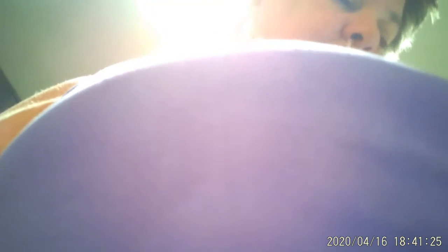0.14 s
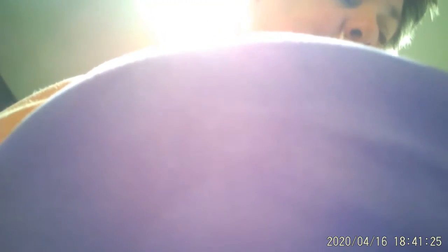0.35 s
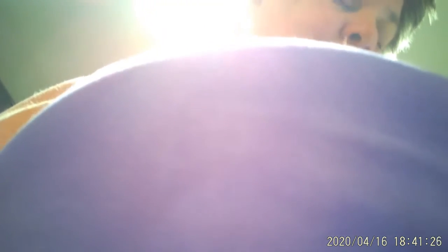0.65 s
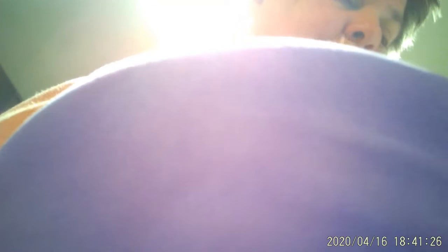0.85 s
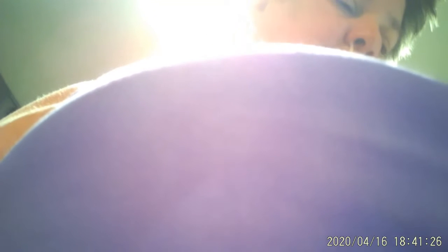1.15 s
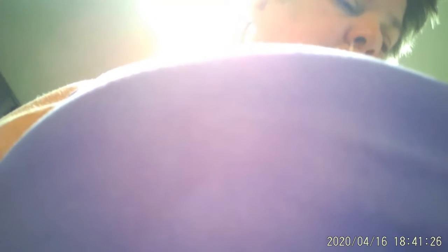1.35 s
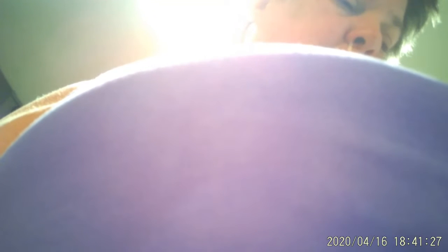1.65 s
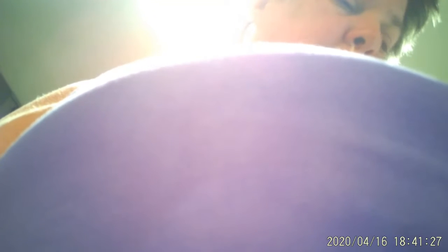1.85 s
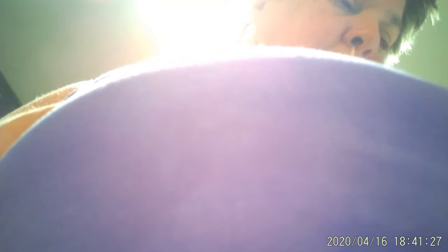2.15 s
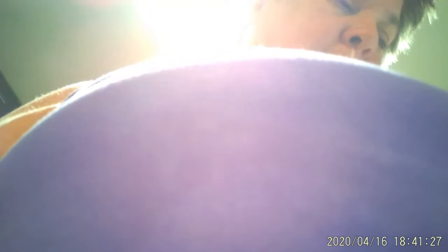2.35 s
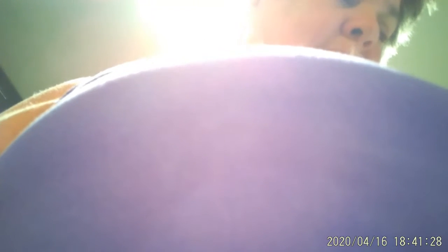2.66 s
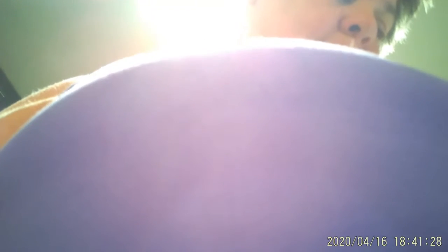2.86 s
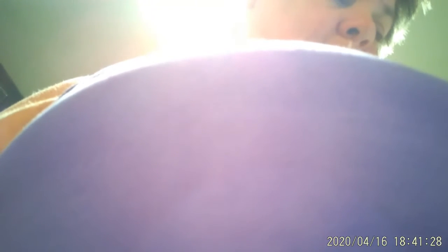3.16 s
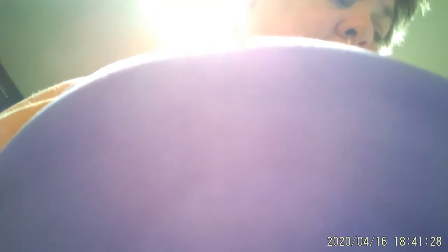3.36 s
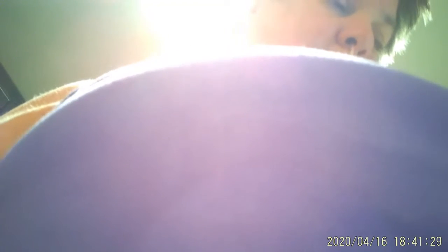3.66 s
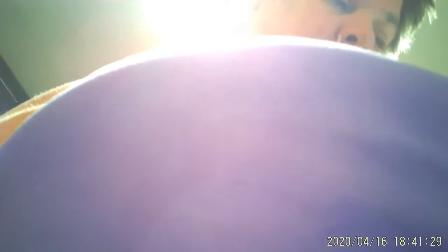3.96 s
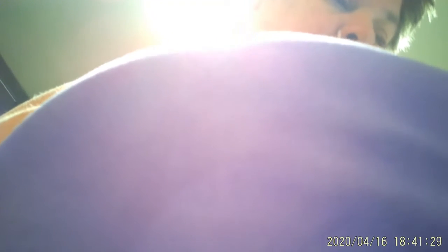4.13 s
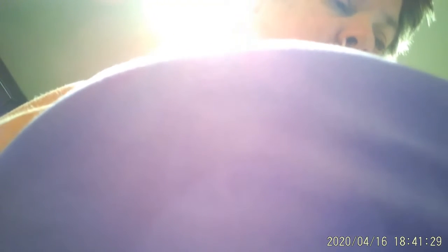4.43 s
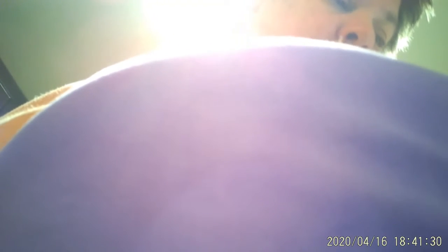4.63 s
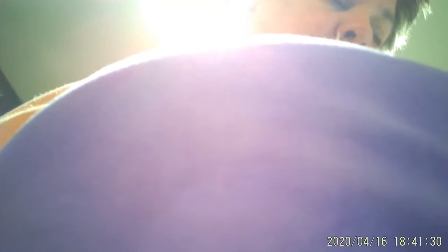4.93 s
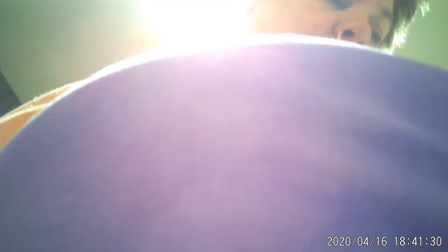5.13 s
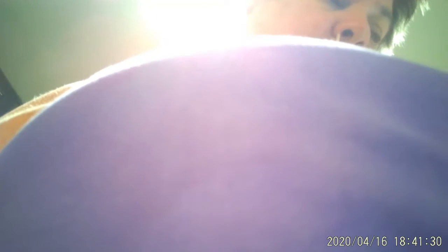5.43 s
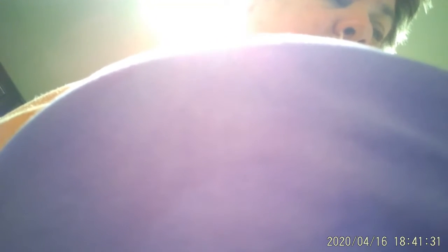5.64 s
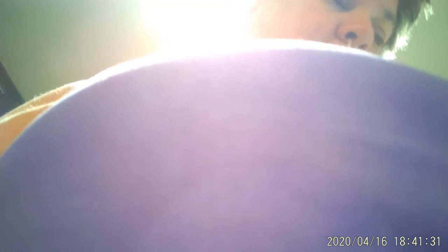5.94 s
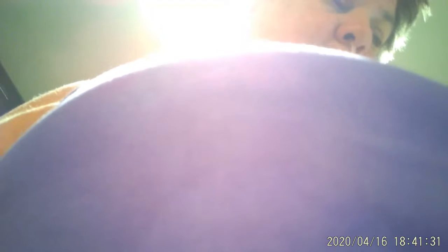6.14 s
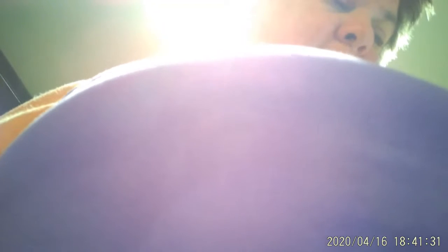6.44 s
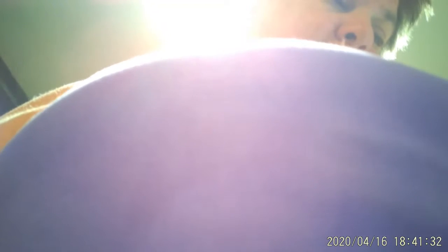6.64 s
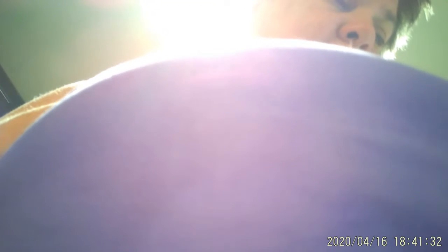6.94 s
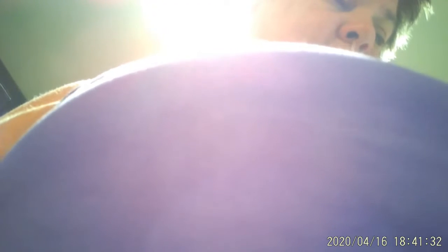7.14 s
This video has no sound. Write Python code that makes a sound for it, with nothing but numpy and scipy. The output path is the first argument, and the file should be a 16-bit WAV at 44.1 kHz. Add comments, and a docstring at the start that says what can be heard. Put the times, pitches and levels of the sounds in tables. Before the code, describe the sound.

Steel knives, forks and spoons are dropped and pushed in a drawer tray. Quick clinks build to a hard, loud clatter just after two seconds, pause briefly, then resume with another strong clank near four seconds. Lighter taps and a gap follow before a last small burst. Each blow is short and damped, with little skids and tray knocks. Close, cheap microphone in a small kitchen with low murmur, hum and hiss.

```python
"""Cutlery in a drawer tray

Knives, forks and spoons are dropped, pushed and stirred in a drawer tray in a small kitchen.
Each blow rings damped steel and tray modes, with a noise crack and a skid of small jolts.
Between blows the pile rattles (random taps on the same modes) and scrapes (coloured noise).
A cheap microphone nearby adds hiss and mains hum to the murmur of the room; sparse echoes are the kitchen."""
import sys
import numpy as np
from scipy import signal
from scipy.fft import rfft, irfft, next_fast_len
from scipy.io import wavfile
from scipy.ndimage import uniform_filter1d

SR = 44100
rng = np.random.default_rng(int(sys.argv[2]) if len(sys.argv) > 2 else 0)


def waveform_to_disk(signal):
    """Save audio, clipped to [-1, 1], as 16-bit WAV at the path in sys.argv[1]."""
    frames = np.transpose(np.atleast_2d(signal))
    scaled = np.clip(frames, -1, 1) * 32767
    samples = np.round(scaled).astype(np.int16)
    wavfile.write(sys.argv[1], SR, samples)


N = 321512
TREBLE_HZ = 6300  # steel modes above this form the treble layer


def gain_of(db):
    """Amplitude factor of a level in dB."""
    return 10 ** (np.asarray(db) / 20)


def evened(x):
    """Scales a sound to rms 1."""
    return x / np.sqrt(np.mean(x ** 2) + 1e-20)


def read(points, hz):
    """Interpolates (Hz, value) points over log frequency."""
    point_hz, value = np.transpose(points)
    return np.interp(np.log(hz + 1), np.log(point_hz + 1), value)


def coloured(x, points):
    """Weights a sound by a spectrum."""
    size = next_fast_len(len(x))
    weight = gain_of(read(points, np.fft.rfftfreq(size, 1 / SR)))
    return irfft(rfft(x, size) * weight, size)[:len(x)]


def lowpass(x, hz):
    """Steep linear-phase lowpass without delay."""
    return signal.oaconvolve(x, signal.firwin(511, hz, window=("kaiser", 9), fs=SR), "same")


# Spectrum of murmur and hiss. Each row: frequency in Hz, relative density in dB per Hz.
ROOM_SPECTRUM = [(8, -32), (27, 5), (42, -20), (90, -19), (125, -3.5), (200, -5.5), (400, -13), (630, -16),
                 (1000, -10.5), (1300, -26), (1700, -27), (2500, -28), (3600, -32.5), (5000, -41),
                 (8000, -44)]
# Steady tones: mains hum and a faint whine. Each row: frequency in Hz, level in dB rms.
HUM_TONES = [(29.5, -61), (59.2, -55.5), (118.4, -63.5), (14169, -106)]
ROOM_DB_RMS = -44.46


def room_tone():
    """Steady murmur and hiss as coloured noise, under sines for mains hum and a faint whine."""
    t = np.arange(N) / SR
    hum = np.zeros(N)
    for hz, db in HUM_TONES:
        hum += gain_of(db) * np.sqrt(2) * np.sin(2 * np.pi * (hz * t + rng.random()))
    murmur = evened(coloured(rng.standard_normal(N), ROOM_SPECTRUM))
    return gain_of(ROOM_DB_RMS) * murmur + hum


# Reverberation of the kitchen. Each row: frequency in Hz, t60 in s.
WALL_T60 = [(300, 0.43), (1000, 0.37), (4000, 0.14), (12000, 0.12)]


def kitchen(x):
    """Sparse echoes of random sign, each band dying at its own speed."""
    taps = np.zeros(SR // 2)
    at = np.arange(200, len(taps) - 20, 20)
    taps[at + rng.integers(0, 20, len(at))] = rng.choice([-1., 1.], len(at))
    hz, t, bands = signal.stft(taps, SR, nperseg=256)
    dying = gain_of(-60 * t / read(WALL_T60, hz)[:, None])
    tail = signal.istft(bands * dying, SR, nperseg=256)[1]
    return signal.fftconvolve(x, tail / np.linalg.norm(tail))[:N]


# Shoves of the pile. Each row: start of full force in s, steel rattle in relative dB, swell in s,
# hold in s, fade in s, treble in dB over steel.
PILE_SHOVES = [(0.208, -31, .04, 0.036, 0.097, -8), (0.347, -28.5, 0.052, 0.0088, 0.07, -11),
               (0.453, -49, .02, 0.01, 0.15, -14), (0.755, -41.5, 0.033, .02, 0.036, -14),
               (0.836, -47, 0.092, .05, .1, -13), (0.987, -25, 0.052, 0.086, 0.13, -15.5),
               (1.203, -43, 0.045, 0.046, 0.052, -15), (1.312, -40.5, 0.013, 0.015, 0.045, -20),
               (1.435, -51.5, 0.14, .05, 0.055, -18), (1.618, -28, 0.06, 0.036, 0.28, -7.5),
               (1.86, -31, 0.087, 0.077, 0.11, -13), (1.938, -25.5, 0.029, 0.027, 0.25, -20),
               (2.094, -26, 0.045, 0.14, 0.092, -4.5), (2.232, -16.5, 0.081, 0.013, 0.085, -6),
               (2.358, -21.5, 0.028, 0.0084, 0.11, -11), (2.408, -33.5, 0.058, 0.019, 0.083, -15),
               (3.042, -37, 0.011, 0.0065, 0.044, -21), (3.117, -36, 0.0047, 0.0071, 0.12, -13),
               (3.285, -45, 0.036, .015, 0.02, -8), (3.379, -32.5, .05, .06, 0.079, -9.5),
               (3.613, -50, 0.024, 0.015, 0.082, -3), (3.762, -33, 0.021, .04, 0.16, -13.5),
               (3.839, -27, 0.082, 0.016, 0.12, -19), (3.994, -31.5, 0.02, 0.016, 0.052, -12.5),
               (4.214, -46, 0.067, 0.024, 0.035, -12), (4.308, -26.5, 0.063, 0.027, 0.041, -6.5),
               (4.379, -24.5, .012, 0.0045, 0.037, -10), (4.443, -42.5, 0.15, 0.046, .08, -18),
               (5.015, -34, .03, .015, .04, -8), (5.047, -29.5, .015, 0.029, .04, -13),
               (5.11, -42.5, 0.046, 0.024, .08, -21), (5.15, -30.5, 0.013, 0.0019, 0.011, -13),
               (5.235, -52, .03, 0.063, .04, -14), (5.474, -28, 0.031, 0.017, 0.069, -16),
               (6.662, -35, 0.007, 0.051, 0.058, -6), (6.825, -36.5, 0.028, 0.025, .03, -7.5),
               (6.863, -31, .01, 0.018, 0.12, -5.5), (7.034, -38.5, 0.0086, .003, 0.035, -16),
               (7.132, -48.5, 0.23, 0.03, 0.047, -12)]
SWELL_DB = 21.5  # gained over the swell, lost over the fade
FADE_BEND = 1.295  # a fade lingers, then drops away
TRAY_DB = -0.26  # over steel at full force
TRAY_SLOPE, TREBLE_SLOPE = 0.27, 0.28  # a weaker shove: the tray fades less than steel, the treble more
KNEE_DB = 33  # further below the peak all three layers fall dB for dB


def shoving(t):
    """Levels of steel, tray and treble: every shove swells, holds and fades; powers add."""
    power = np.full((3, len(t)), 1e-14)
    share = np.array([[1], [1 - TRAY_SLOPE], [1 + TREBLE_SLOPE]])
    for s, steel_db, swell_s, hold_s, fade_s, treble_db in PILE_SHOVES:
        late = t - s
        swell_db = SWELL_DB * late / swell_s
        fade_db = -SWELL_DB * (np.maximum(late - hold_s, 0) / fade_s) ** FADE_BEND
        down_db = np.maximum(np.where(late < 0, swell_db, fade_db), -150)
        knee_db = np.minimum(down_db + KNEE_DB, 0)
        peak_db = steel_db + np.array([[0], [TRAY_DB], [treble_db]])
        power += gain_of(peak_db + share * (down_db - knee_db) + knee_db) ** 2
    return np.sqrt(power)


def jostled(modes, extra_hz, per_s, spread_db):
    """Tiny collisions of uneven size, each ringing one mode as a two-pole resonator."""
    out = np.zeros(N)
    for hz, width_hz, db in modes:
        taps = (rng.random(N) < per_s / SR) * rng.choice([-1., 1.], N)
        size = np.minimum(rng.exponential(1, N), 3)
        taps *= gain_of(spread_db * size)
        r = np.exp(-np.pi * (width_hz + extra_hz) / SR)
        poles = [1, -2 * r * np.cos(2 * np.pi * hz / SR), r * r]
        out += gain_of(db) * evened(signal.lfilter([1], poles, taps))
    return evened(out)


# Cutlery modes, shared with the blows. Each row: frequency in Hz, base width in Hz, base gain in dB.
STEEL_MODES = [(1698, 170, 2.5), (1823, 76, -8.5), (2266, 104, -1), (2540, 51, -8), (2781, 120, -2),
               (3379, 116, 0.5), (3630, 56, -15), (4294, 31, -8), (4675, 75, 0), (4750, 72, -6.5),
               (5000, 77, -1.5), (5560, 66, -4.5), (6038, 76, -9.5), (6270, 51, -13), (7200, 14, -14),
               (7515, 125, -12), (7730, 11, -19.5), (8010, 50, -15.5), (8640, 16, -18), (9620, 41, -8),
               (10270, 44, -8), (11480, 80, -16), (12000, 49, -39), (13300, 60, -31), (14890, 140, -3.5),
               (13400, 30, -10)]
# Tray and drawer modes, shared with the blows. Each row: frequency in Hz, base width in Hz, base gain in dB.
TRAY_MODES = [(218, 91, -9.5), (362, 25, -8.5), (402, 49, -2), (509, 26, -8), (610, 40, -8),
              (738, 15, -7.5), (878.5, 53, -0.5), (981, 66, -5), (1148, 45, -5)]
# Colour of bare contacts, shared with the blows. Each row: frequency in Hz, relative density in dB per Hz.
CONTACT_SPECTRUM = [(120, -69), (200, -8.5), (390, -14.5), (581, -10), (624, 2.5), (683, -15), (880, -7.5),
                    (1460, -7.5), (1720, 1), (3870, -1.5), (4890, -12), (6770, -21), (10100, -28.5),
                    (15000, -27)]
LUMPS_DB, LUMP_S = 2, 0.012  # the rattle comes in uneven lumps


def rattle():
    """The stirred pile: ringing steel, dry scraping and the shaken tray follow the hand."""
    level = shoving(np.arange(0, N + 32, 32) / SR).repeat(32, axis=1)[:, :N]
    knots = rng.standard_normal(N // 200)
    lumps = np.interp(np.arange(N) / SR / LUMP_S, np.arange(len(knots)), knots)
    level = level * gain_of(LUMPS_DB * lumps)

    grain_size = np.minimum(rng.exponential(1, N // 40 + 1), 3).repeat(40)[:N]
    grit = coloured(rng.standard_normal(N) * gain_of(0.82 * grain_size), CONTACT_SPECTRUM)
    low, below_treble = lowpass(grit, 1304), lowpass(grit, TREBLE_HZ)

    steel_modes = [m for m in STEEL_MODES if m[0] <= TREBLE_HZ]
    treble_modes = [m for m in STEEL_MODES if m[0] > TREBLE_HZ]
    steel = jostled(steel_modes, extra_hz=45, per_s=440, spread_db=5)
    treble = jostled(treble_modes, extra_hz=14, per_s=290, spread_db=6)
    tray = jostled(TRAY_MODES, extra_hz=30.6, per_s=120, spread_db=3)

    layers = [0.61 * steel + 0.51 * evened(below_treble - low),
              0.75 * tray + 0.45 * evened(low),
              0.67 * treble + 0.68 * evened(grit - below_treble)]
    return gain_of(-3) * (uniform_filter1d(level, 150) * layers).sum(0)


def skidding(skid, jolts):
    """The first contact, then a spray of small jolts while the piece slides to rest."""
    t = np.arange(len(jolts)) / SR
    train = 0.49 * skid * jolts * np.exp(-(t / (0.03 * skid)) ** 2)
    train[0] = 1
    return train


def favoured(modes_hz, db, struck_hz, luck, near_db, spread, luck_db):
    """Gains of the modes: those near the struck pitch are strong, and chance wakes a few others."""
    near = np.exp(-(np.log(modes_hz / struck_hz) / spread) ** 2)
    return gain_of(db + near_db * near + luck_db * luck[:len(db)] ** 3)


def ring(modes_hz, widths_hz, gains, phases, rise_s, t):
    """Dying sines with a short rise, scaled to peak 1; phases in cycles."""
    decay = np.exp(-np.pi * np.outer(widths_hz, t))
    sines = np.sin(2 * np.pi * (np.outer(modes_hz, t) + phases[:, None]))
    sound = gains @ (decay * sines) * (1 - np.exp(-t / rise_s))
    return sound / abs(sound).max()


# Blows. Each row: start in s, level in dB, tray knock in dB over level, treble in dB over level,
# clank pitch in Hz, favoured knock pitch in Hz, skid after the blow from 0 to 1.
CUTLERY_BLOWS = [(0.1447, -20.5, -5, -13, 2380, 338, 0.7), (0.191, -20.5, -13, -11.5, 3100, 589, 0.7),
                 (0.2014, -20, -22, -13, 4850, 323, 1), (0.2348, -17, -0.5, -19, 1930, 766, 0.54),
                 (0.3438, -17, -7.5, -9, 4400, 510, .8), (0.4567, -29.5, -10, -16, 3730, 1040, 0.76),
                 (0.5339, -32.5, -10, -15, 1760, 1010, 0.93), (0.598, -31, -0.5, -31, 2370, 905, 0.56),
                 (0.7539, -28, -1, -12.5, 1600, 870, 0.9), (0.8322, -19, -5.5, -18.5, 4580, 835, .65),
                 (0.9517, -22, -2.5, -23, 1840, 815, 0.57), (0.9722, -16.5, -16, -14, 5170, 1020, 1),
                 (0.9842, -22.5, 2.5, -2, 2250, 740, 0.99), (1.0285, -11.5, -3.5, -13.5, 1860, 435, 0.93),
                 (1.0794, -15, -4.5, -38, 2260, 964, .5), (1.1259, -15.5, 0, -14.5, 1690, 430, 0.6),
                 (1.2004, -23, -14, -28, 1720, 506, 0.67), (1.2326, -28, -2.5, -15, 2280, 740, 0.74),
                 (1.3057, -31, -13, -15, 2437, 860, 0.8), (1.3568, -22.5, -10, -21, 2200, 721, 0.2),
                 (1.4207, -33, -5.5, -18, 2350, 859, 0.9), (1.4927, -30.5, -7, -16, 2000, 393, 0.47),
                 (1.5559, -37, -5, -18, 4880, 870, 0.6), (1.5798, -18, -13, -19, 2320, 1180, 0.65),
                 (1.6003, -14.5, -4.5, -30, 1920, 730, 0.4), (1.6132, -9, -13, -14, 3430, 735, 0.4),
                 (1.6289, -6.5, -16, -15, 2960, 353, .8), (1.6571, -9.5, -26, -19, 5000, 387, 0.66),
                 (1.7097, -11, -29, -18, 3500, 872, 0.76), (1.8297, -20.5, -24, -24, 4770, 336, 1),
                 (1.9297, -11, -7.5, -13, 4950, 980, 0.64), (1.95, -13.5, -9, -9.5, 4950, 744, 0.78),
                 (2.0209, -18, -29, -12, 1860, 347, 0.83), (2.0966, -9.5, -12.5, -12, 5100, 864, 1),
                 (2.1492, -14, -7.5, -10.5, 3730, 859, 0.97), (2.1864, -5.5, -31, -20, 1870, 864, .3),
                 (2.2142, 1.5, -6.5, -17.5, 1635, 880, 0.74), (2.2316, -1.5, -5, -15, 1810, 888, 0.83),
                 (2.3556, -6, -18, -28, 4200, 417, .2), (2.36, 0, -14, -13.5, 2400, 900, 0.52),
                 (2.4308, -15.5, -18, -21, 4520, 921, 0.3), (3.038, -20.5, -6.5, -18, 3090, 590, 0.43),
                 (3.0789, -21.5, -10, -43, 2290, 398, .35), (3.1174, -18.5, -26, -10, 2100, 1020, 0.53),
                 (3.3436, -14.5, -1, -50, 2600, 660, 0.74), (3.3772, -14.5, -3.5, -13.5, 3920, 746, 0.78),
                 (3.42, -8.5, -5, -17.5, 1910, 570, 0.43), (3.6204, -21, 0.5, -61, 2190, 794, 0.55),
                 (3.7459, -29, -10, -31, 2090, 506, .9), (3.7628, -18, -26, -15, 3520, 524, 0.65),
                 (3.819, -7, -22, -12, 5150, 1130, 0.47), (3.8675, 1.5, -13.5, -45, 1914, 790, 0.38),
                 (3.8806, -18, -2, -9, 1580, 635, 0.5), (3.9848, -25.5, -7, -14, 4400, 610, 0.86),
                 (4.1805, -34.5, 7, -15, 2400, 500, 0.5), (4.2298, -28, -7, -12.5, 4690, 770, 0.9),
                 (4.2964, -15, -5.5, -17, 5550, 615, 1), (4.3779, -11, -5.5, -14, 2680, 870, 0.45),
                 (4.4709, -27.5, 10, -24, 2190, 413, 0.5), (4.5124, -35, 4.5, -25, 2540, 460, .55),
                 (4.6364, -41.5, -2, -15, 2100, 848, 1), (4.7977, -37, -2, -20, 1680, 584, 1),
                 (4.864, -37, -11, -24, 2340, 350, 0.84), (5.0123, -21.5, -16, -12.5, 4240, 888, 0.4),
                 (5.0574, -24.5, 2, -9, 1730, 400, .7), (5.145, -29, -24, -4, 1690, 950, 0.1),
                 (5.294, -41, 0.5, -14, 2100, 406, .65), (5.438, -24, -13, -15, 3420, 336, 0.25),
                 (5.458, -19, -7.5, -12, 5230, 872, 0.77), (5.5332, -27.5, -4, -9, 2830, 417, 0.4),
                 (5.6266, -20.5, -9, -13, 2400, 830, .52), (5.7331, -24.5, -2, -41, 3270, 425, 0.67),
                 (5.8546, -25.5, -39, -15, 2560, 900, .2), (5.9236, -35, -7, -9.5, 4850, 315, 0.5),
                 (6.0008, -34, -7, -11.5, 4870, 930, 0.6), (6.6532, -15.5, -15, -18, 3400, 633, .75),
                 (6.765, -30.5, 4, -16, 4660, 794, 0.76), (6.8628, -12.5, -26, -11, 5100, 886, 0.99),
                 (7.011, -28.5, -8, -14, 3200, 965, 0.5), (7.0306, -21.5, -2.5, -35, 1940, 384, 0.56),
                 (7.0668, -27.5, -9, -17, 3400, 877, 0.55), (7.1136, -29, -1, -18, 1890, 860, 0.87),
                 (7.1473, -32.5, 3.5, -18, 1890, 940, 0.5)]
# High rings in Hz; a blow favours one by chance.
HIGH_RINGS_HZ = [6167, 7470, 9980]
RING_LENGTH = 0.78  # base factor on decay time
RING_PER_TRAY_DB, RING_PER_TREBLE_DB = -0.01, 0.02  # steel on steel rings longer than a dull tray blow


def blows():
    """A short clank at the contact, ringing steel, a knock of the tray and a dry crack, then a skid."""
    hz, width_hz, db = np.transpose(STEEL_MODES)
    low_hz, low_width_hz, low_db = np.transpose(TRAY_MODES)
    high = hz > TREBLE_HZ
    t, out = np.arange(SR // 5) / SR, np.zeros(N + SR)
    count, jolt_len = len(CUTLERY_BLOWS), SR // 12
    chance = rng.random((count, 4, 32))
    cracks = rng.standard_normal((count, len(t)))
    jolts = rng.standard_normal((count, jolt_len)) * (rng.random((count, jolt_len)) < 700 / SR)  # 700 per s
    for row, (luck, phase, low_luck, more), crack, jolt in zip(CUTLERY_BLOWS, chance, cracks, jolts):
        s, level_db, tray_db, treble_db, clank_hz, knock_hz, skid = row
        length = RING_LENGTH + RING_PER_TRAY_DB * (tray_db + 4.5) + RING_PER_TREBLE_DB * (treble_db + 20)

        ring_hz = HIGH_RINGS_HZ[int(len(HIGH_RINGS_HZ) * more[-1])]
        gains = favoured(hz, db, clank_hz, luck, 10.7, 0.096, 6.9)
        gains += favoured(hz, db, ring_hz, luck[::-1], 17, 0.015, 11.6)
        piece_hz = hz * (1 + 0.02 * (more[:len(hz)] - 0.5))  # no two pieces are quite alike
        woken = gains / gain_of(db)
        # a dull blow wakes little above its clank
        octaves_above = np.log2(np.clip(hz, clank_hz, TREBLE_HZ) / clank_hz)
        gains *= gain_of(0.5 * min(treble_db + 9, 0) * octaves_above)
        # the pile damps whatever it touches, the weakly woken modes most
        damped_hz = width_hz / max(length, 0.2) * (1 + 1.75 * (1 - woken / woken.max()))

        clank_modes_hz = clank_hz * np.array([0.9, 1, 1.15])
        clank = ring(clank_modes_hz, [300] * 3, np.array([0.6, 1, 0.6]), phase[:3], 0.00049, t)
        phases = phase[:len(hz)]
        steel = ring(piece_hz[~high], damped_hz[~high], gains[~high], phases[~high], 0.00059, t)
        treble = ring(piece_hz[high], damped_hz[high], gains[high], phases[high], 0.00018, t)
        treble += gain_of(-11) * evened(np.diff(crack, prepend=0)) * np.exp(-t / 0.007)
        low_gains = favoured(low_hz, low_db, knock_hz, low_luck, 8.8, 0.11, 6.7)
        knock = ring(low_hz, low_width_hz + 30, low_gains, phase[-len(low_hz):], 0.0012, t)
        snap = 0.12 * evened(coloured(crack, CONTACT_SPECTRUM)) * np.exp(-t / 0.0019)

        blow = 0.24 * clank + 0.5 * steel + snap
        blow += gain_of(treble_db) * treble + gain_of(tray_db) * knock
        skidded = signal.fftconvolve(blow, skidding(skid, jolt))[:len(t)]
        out[round(s * SR):][:len(t)] += gain_of(level_db) * skidded
    return out[:N]


def scene():
    """Blows and rattle with their echoes, over the room tone."""
    cutlery = blows() + rattle()
    return (cutlery + gain_of(-12.5) * kitchen(cutlery) + room_tone())[None]


MIC_HZ, EDGE_HZ = 14650, 15750


def record(dry):
    """The microphone loses the top treble, clips at full scale, then comes the band limit."""
    heard = lowpass(dry[0], MIC_HZ)
    return lowpass(np.clip(heard, -1, 1), EDGE_HZ)[None]


dry = scene()
out = record(dry)
waveform_to_disk(out)
```